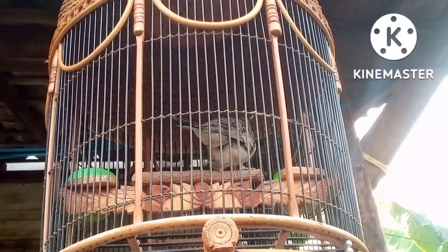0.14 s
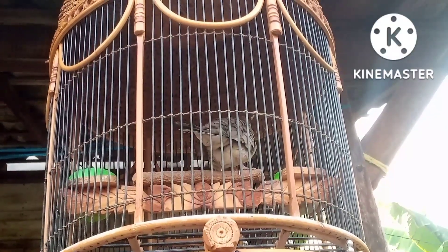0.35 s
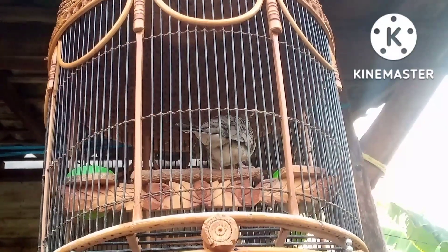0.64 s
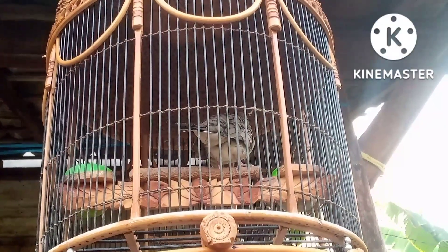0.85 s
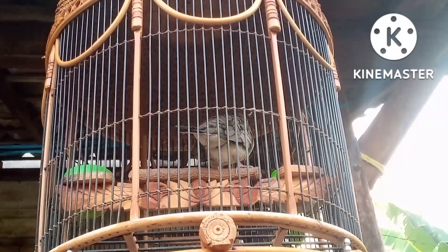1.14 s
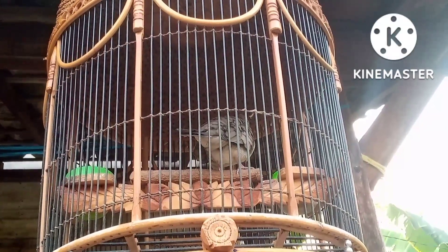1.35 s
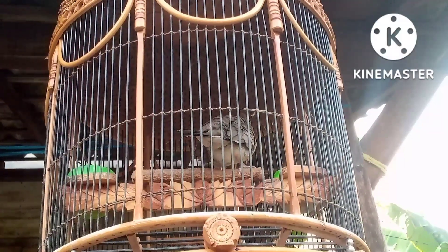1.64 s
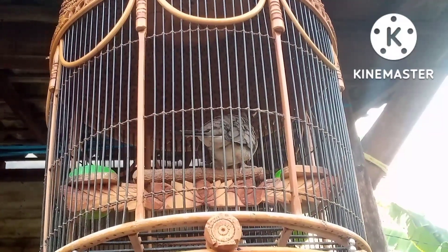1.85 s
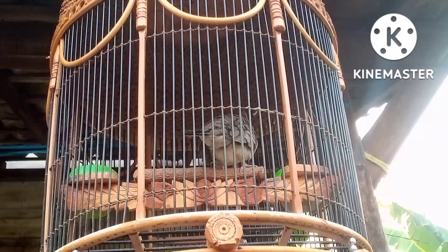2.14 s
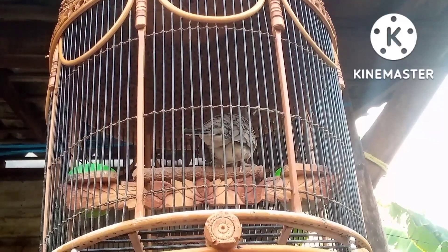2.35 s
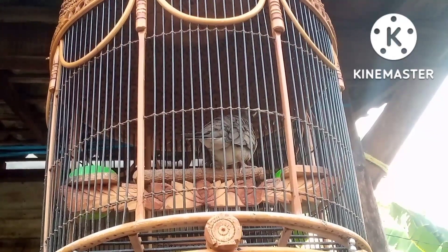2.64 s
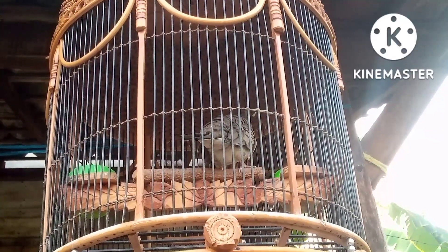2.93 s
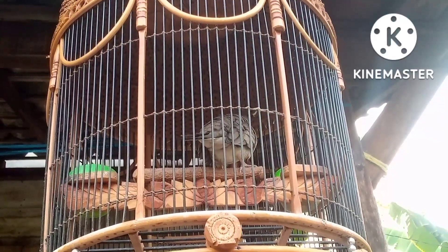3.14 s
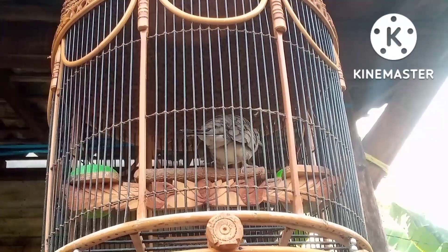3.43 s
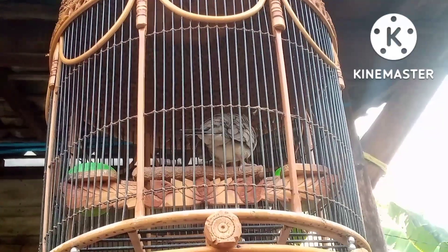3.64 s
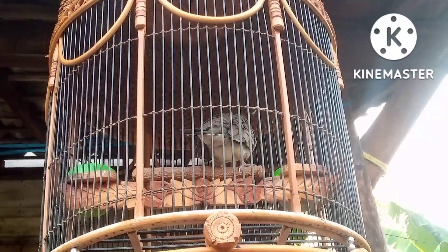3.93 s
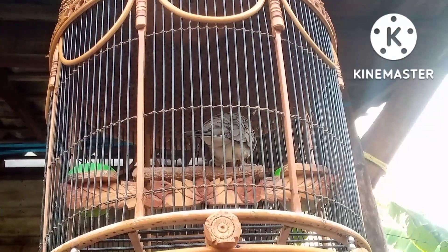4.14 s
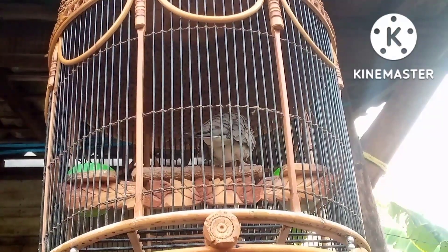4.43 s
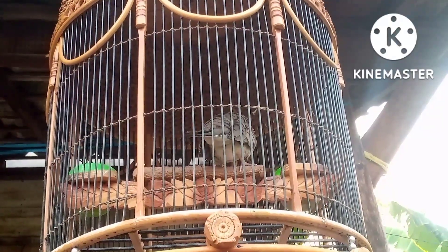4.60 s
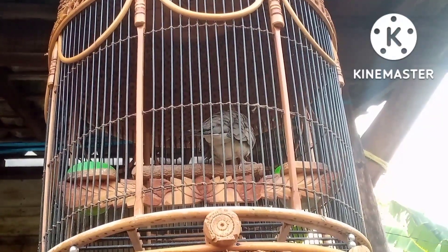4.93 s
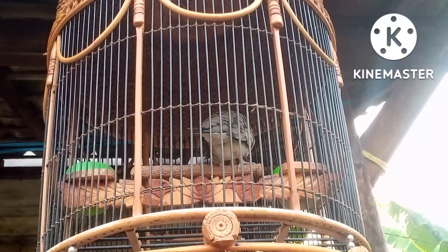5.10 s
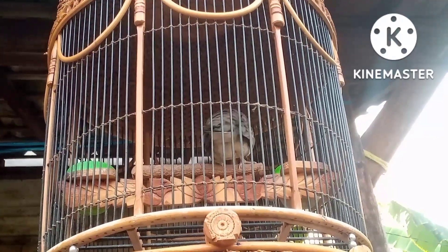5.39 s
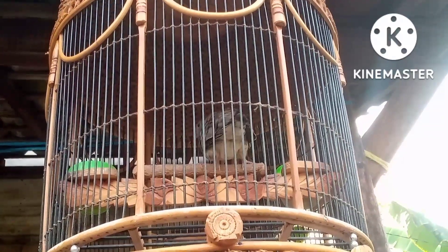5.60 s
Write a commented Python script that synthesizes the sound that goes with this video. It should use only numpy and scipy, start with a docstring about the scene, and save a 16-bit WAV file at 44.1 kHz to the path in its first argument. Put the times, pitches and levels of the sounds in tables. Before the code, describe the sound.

Under a porch roof, a distant dove coos faintly twice while a small bird whistles thinly and something ticks and swishes. A low hum swells, then a rooster close by crows loudly with cracks and a long held ending. A far rooster answers dimly, swishes return, and the caged dove gives a short throbbing coo. Low traffic rumbles throughout; mono phone pickup with short roof echoes.

```python
"""From the start a far dove coos twice, a small bird whistles high up, and something ticks and swishes.
At 2 s a low hum swells; a rooster crows close by, its voice built from partials, cracks and rasping air.
As it ends, a rooster far off answers with blurred low partials, and the whistle and swish return.
Last, a caged dove under a porch roof coos in short throbbing trills made of near sines.
Traffic noise rumbles all along; roof and yard echo, and a phone picks it all up in mono."""
import sys
import numpy as np
from scipy import signal
from scipy.fft import rfft, irfft, next_fast_len
from scipy.io import wavfile
from scipy.ndimage import uniform_filter1d

SR = 44100
rng = np.random.default_rng(int(sys.argv[2]) if len(sys.argv) > 2 else 0)


def transcribe(signal):
    """Save signal, clipped to [-1, 1], as a 16-bit WAV file at the path in sys.argv[1]."""
    frames = np.atleast_2d(signal).T
    limited = np.clip(frames, -1, 1)
    pcm = np.round(limited * 32767).astype(np.int16)
    wavfile.write(sys.argv[1], SR, pcm)


N = 254016

# All levels are relative: the functions may add to them.
# Near rooster, one list a note: (time [s], pitch [Hz], level [dB], beak resonance [Hz],
# level of the upper partials [dB])
CROW_NOTES = [
    [(2.129, 514.4, -42, 1660, -49), (2.151, 619.2, -41.5, 2400, -41), (2.187, 625.3, -30.5, 2530, -42.5),
     (2.192, 669, -31, 1380, -49)],
    [(2.198, 813.4, -34.5, 1700, -31), (2.222, 819.3, -27.5, 1620, -36.5), (2.26, 809.8, -30, 1660, -34.5),
     (2.28, 804.2, -33, 1794, -36.5), (2.322, 818, -41.5, 1700, -46.5), (2.345, 773.6, -38.5, 1660, -45)],
    [(2.432, 571, -54, 1280, -56), (2.445, 640.7, -38, 1315, -44), (2.46, 796, -25, 2003, -37),
     (2.47, 856, -36.5, 1780, -37), (2.482, 851.3, -23, 1800, -37)],
    [(2.488, 971, -28, 1926, -33.5), (2.516, 962.8, -27, 2020, -33.5), (2.566, 990.3, -36.5, 1645, -37),
     (2.59, 994, -35, 1600, -55)],
    [(2.612, 602.5, -51, 1340, -56), (2.635, 619, -46, 1260, -49.5), (2.652, 644, -41.5, 1350, -45),
     (2.662, 760.4, -23.5, 1900, -39), (2.678, 756.7, -28.5, 2250, -39.5), (2.708, 777, -26.5, 1651, -31.5)],
    [(2.716, 812, -30.5, 1480, -29), (2.732, 825, -31, 1667, -33), (2.8, 842.2, -32.5, 1680, -35),
     (2.956, 830.3, -33.5, 1690, -34), (3.044, 827.6, -32, 1713, -33.5), (3.06, 809, -30, 1596, -46)],
    [(3.066, 810, -47, 1643, -44.5), (3.102, 688, -47, 1448, -46.5), (3.124, 565, -40, 1702, -47.5),
     (3.15, 627, -44.5, 1343, -46), (3.184, 654.3, -33, 1350, -38)],
    [(3.192, 788, -30.5, 1691, -43.5), (3.238, 784, -32.5, 1634, -40.5), (3.48, 783, -33, 1692, -42.5),
     (3.55, 780.5, -33.5, 1548, -40), (3.59, 778.7, -34.5, 1570, -45.5), (3.63, 792.9, -27.5, 1826, -38.5),
     (3.674, 793.3, -29.5, 1720, -46), (3.71, 794.7, -33, 2400, -42), (3.73, 784.7, -30.5, 1760, -52),
     (3.745, 767, -30.5, 1863, -63.5), (3.775, 780, -44.5, 1820, -57)],
]
# Throat's effect on the upper partials and breath, first notes: (frequency [Hz], level [dB])
FIRST_THROAT = [(2180, -58), (3700, -57.5), (4900, -14.5), (5330, -23), (5830, -7.5), (6230, -17.5),
                (6780, 2), (7110, -14), (7690, -5), (8060, -30), (8610, -17.5), (9600, -26.5), (15500, -35)]
# The same in the long last note: (frequency [Hz], level [dB])
LAST_THROAT = [(2180, -42), (3700, -25.5), (4460, -34), (5460, -4), (5910, -8), (7870, -7), (8260, -37),
               (10200, -15.5), (10600, -57), (11500, -23), (13000, -59), (14800, -21.5), (15500, -7.5)]
# Throat's effect on the four lowest partials: (frequency [Hz], level [dB])
LOW_PARTIAL_THROAT = [(500, -24), (640, -14), (800, -10.5), (980, -10), (1250, -10.5), (1650, -12),
                      (2000, -13), (2450, -15), (2750, -29), (2950, -36.5), (3150, -27.5), (3280, -24),
                      (3380, -9.5), (4000, -32)]
# Colour of the air rasping in the throat: (frequency [Hz], level [dB per Hz])
RASP_COLOUR = [(260, -47), (450, -71), (767, 9), (1090, -25), (1370, 1), (2130, 3), (2870, -21), (3420, -5),
               (4340, -25.5), (6470, -6), (8700, -53), (15500, -56)]
# Moments when the voice cracks: (time [s], added roughness [0-1], half length [s])
VOICE_CRACKS = [(2.125, .1, .02), (2.24, .03, .08), (2.29, .22, .02), (2.445, .22, .03), (2.52, .04, .06),
                (2.57, .22, .03), (2.635, .22, .025), (2.7, .17, .013), (3.085, .46, .035),
                (3.19, .12, .015), (3.77, .12, .04)]
# One held note trembles: (start [s], end [s], rate [Hz], share of pitch [ratio], level swing [dB])
NOTE_TREMBLE = 2.756, 3.06, 35, .004, 3.5
# Caged dove: (start [s], length [s], start pitch [Hz], top pitch [Hz], end pitch [Hz], level [dB])
CAGED_COOS = [(5.198, 0.16, 876, 1200, 1082, -38.5), (5.366, 0.049, 1085, 1119, 990, -46.5),
              (5.418, 0.088, 1013, 1006, 972, -50), (5.515, 0.073, 1019, 1066, 1040, -50),
              (5.612, 0.09, 935, 1122, 1094, -41)]
# Dove farther off: (start [s], length [s], start pitch [Hz], top pitch [Hz], end pitch [Hz], level [dB])
DISTANT_COOS = [(0.022, .042, 1114, 1149, 1138, -49), (0.075, 0.043, 1122, 1112, 1124, -54.5),
                (0.148, 0.204, 1034, 1133, 1136, -51), (1.37, 0.366, 1114, 1280, 1192, -69)]
# Air around a coo: (frequency [Hz], level [dB per Hz])
COO_AIR = [(750, -14), (1050, 4), (1350, -7), (1700, -13.5), (2150, -9), (2500, -12.5), (2800, -28)]
# Far rooster: (start [s], length [s], start pitch [Hz], middle pitch [Hz], end pitch [Hz], level [dB],
# beak resonance [Hz])
FAR_NOTES = [(3.95, 0.21, 548.5, 549.5, 565, -66.5, 1100), (4.16, 0.097, 584, 606.4, 585, -64, 1200),
             (4.27, 0.3, 569.5, 552.4, 558, -64, 1080), (4.61, 0.0894, 520, 525, 523.7, -60.5, 2610),
             (4.8, 0.14, 496.5, 498, 503.3, -63, 1980), (5.03, 0.12, 529.6, 518, 523, -69, 2088),
             (5.17, .05, 632, 650, 650, -62, 1300)]
# Strength of the far rooster's partials, lowest first: (level [dB])
FAR_PARTIALS = [-7.5, -2, 4.5, -4, -20]
# Small bird: (start [s], length [s], start pitch [Hz], lowest pitch [Hz], level [dB])
BIRD_NOTES = [(0.09, 0.24, 6860, 6430, -70.5), (0.584, 0.05, 7070, 6300, -70),
              (0.728, 0.043, 7600, 7230, -71.5), (0.947, .05, 7100, 6560, -69),
              (1.236, .05, 7560, 6950, -68.5), (1.435, 0.081, 7240, 6560, -67),
              (1.575, 0.17, 6900, 6480, -67.5), (1.875, 0.17, 6780, 6450, -62.5),
              (4.387, .22, 6720, 6580, -64.5), (5.044, 0.22, 6820, 6545, -66)]
# Ticks: (time [s], peak level [dB], centre [Hz])
TICK_EVENTS = [(0.2644, -70, 6600), (0.7946, -51.5, 6100), (0.8144, -54, 5850), (1.07, -55, 6940),
               (1.2072, -58.5, 5600)]
# Swishes: (start [s], rise [s], fall [s], level [dB], level of the treble layer [dB])
SWISH_EVENTS = [(0.25, 0.036, 0.19, -75, -100), (1.65, 0.044, 0.34, -69.5, -92),
                (3.95, 0.11, 0.2, -78, -99), (4.4, 0.063, 0.13, -77.5, -98), (4.74, .13, 0.087, -73, -81.5),
                (5.1, .17, 0.14, -77, -96), (5.41, 0.2, 0.055, -68.5, -79), (5.7, .06, .02, -79, -88)]
# Colour of a swish: (frequency [Hz], level [dB per Hz])
SWISH_BODY = [(710, -29.5), (1200, -0.5), (1530, -8.5), (1870, -10), (2060, -6), (2310, -10.5), (3570, -20),
              (6650, -6), (8500, -40), (11000, -51), (18700, -120)]
# Colour of its treble layer: (frequency [Hz], level [dB per Hz])
SWISH_TREBLE = [(4710, -26), (8000, -4.5), (10600, -14), (12500, -32), (14900, -5), (15500, -0.5)]
# Low hum: (middle [s], half length [s], pitch [Hz], level [dB])
LOW_HUM = 2, 0.34, 200.5, -58.5
# Colour of the distant noise: (frequency [Hz], level [dB per Hz])
YARD_COLOUR = [(18, -35), (30, -21), (66, -2.5), (111, 0), (270, -11), (897, -29.5), (1110, -25.5),
               (1330, -28.5), (2130, -28.5), (3590, -47.5), (5890, -32.5), (6890, -37), (8280, -57),
               (13300, -59), (15500, -48)]
# Swells of a low engine note: (time [s], level [dB])
ENGINE_SWELLS = [(0.15, -57), (0.61, -58.5), (1.07, -55.5), (1.83, -57), (2.34, -69), (5.3, -82),
                 (5.76, -68)]

# hoarseness: a small constant part, more when the membrane is slack (low pitch), none extra when taut
CLEAN, TAUT_HZ, SLACK_HZ, SLACK_ROUGH = .032, 670, 560, .33
HELD_FROM_S = 3.15  # from here the throat has its last shape
BEAK_DB, FAR_BEAK_DB, BEAK_OCTAVES = 12.5, 6.5, 0.2  # lift near and far, half width
WHISTLE_FALL_S, WHISTLE_ENTRY_DB = .065, -4
WHISTLE_FADE_DB_S, WHISTLE_RECOVER_HZ_S = -40, 695  # change per second
SWISH_EDGE_DB = -10  # at both ends, under the peak
YARD_DB = -57
RUMBLE_HZ, RUMBLE_WIDTH_HZ, RUMBLE_IDLE_DB, RUMBLE_SWELL_S = 63.3, 4.3, -76, 0.13
# echoes: time for the bass to fade by 60 dB, and level of each echo path
PORCH_T60_S, PORCH_DB, YARD_T60_S, YARD_ECHO_DB = 0.42 / 1.5, -12.5, 1 / 1.5, -21
DULL_HZ = 8300 * np.sqrt(1.5)  # here echoes fade twice as fast as in the bass
SCATTER = 0.65
TOP_HZ = 15550  # top of the phone's range


def undb(db):
    """Turn decibels into an amplitude factor."""
    return 10 ** (np.asarray(db) / 20)


def unit(x):
    """Scale to an average strength (RMS) of 1."""
    return x / np.sqrt(np.mean(x ** 2))


def clock():
    """Time of every sample in seconds."""
    return np.arange(N) / SR


def turns(hz):
    """Add up a changing pitch into the angle of a sine."""
    return 2 * np.pi * np.cumsum(hz) / SR


def colour(x, points):
    """Filter by (Hz, dB) points joined on a log-frequency axis; nearly silent beyond them."""
    hz, db = np.transpose(points)
    f = np.maximum(np.arange(len(x) // 2 + 1) * SR / len(x), 1)
    gain_db = np.interp(np.log(f), np.log(hz), db, left=-90, right=-90)
    return irfft(rfft(x) * undb(gain_db), len(x))


def hiss(points):
    """Noise coloured by (Hz, dB) points, at strength 1."""
    return unit(colour(rng.standard_normal(N), points))


def walk(rate, at=slice(None)):
    """Smooth random drift of spread about 1; a higher rate drifts faster."""
    steps = uniform_filter1d(rng.standard_normal(int(4 * rate * N / SR) + 8), size=5)
    steps = unit(uniform_filter1d(steps, size=3))
    return np.interp(clock()[at], np.linspace(0, N / SR, len(steps)), steps)


def play(notes, fade_s):
    """Draw the columns of all notes over time, with a gate that opens during each note."""
    s, *columns = np.transpose(np.concatenate(notes))
    gate = 0
    for note in notes:
        start_s, end_s = note[0][0], note[-1][0]
        gate = gate + np.interp(clock(), [start_s - fade_s, start_s, end_s, end_s + fade_s], [0, 1, 1, 0])
    return np.minimum(gate, 1), [np.interp(clock(), s, c) for c in columns]


def syllables(rows, rise, hold, entry_db, sag_db):
    """Each syllable moves to its middle pitch, glides to its end pitch at full level, then changes level."""
    # rise and hold are shares of the length
    return [[(s, start_hz, db + entry_db, *rest),
             (s + rise * length, hz, db, *rest),
             (s + min(rise + hold, .97) * length, end_hz, db, *rest),
             (s + length, end_hz, db + sag_db, *rest)]
            for s, length, start_hz, hz, end_hz, db, *rest in rows]


def beak_lift(hz, beak_hz, lift_db):
    """The beak resonance lifts partials close to it, in dB."""
    return lift_db * np.exp(-(np.log2(hz / beak_hz) / BEAK_OCTAVES) ** 2)


def rooster():
    """Partials of one membrane; hoarseness shakes the cycles, adds half lines and lets air rasp through."""
    gate, columns = play(CROW_NOTES, fade_s=.003)
    on = gate > 0
    t = clock()[on]
    hz, *shape = (c[on] for c in columns)
    # muscles change the loudness no faster than this
    level_db, beak_hz, upper_db = uniform_filter1d(shape, size=500)
    rough = CLEAN + np.interp(hz, [SLACK_HZ, TAUT_HZ], [SLACK_ROUGH, 0])
    rough = rough + sum(r * np.exp(-((t - s) / half) ** 2) for s, r, half in VOICE_CRACKS)

    start_s, end_s, tremble_hz, share, tremble_db = NOTE_TREMBLE
    tremble = (t > start_s) * (t < end_s) * np.sin(2 * np.pi * tremble_hz * (t - start_s))
    pitch_shake = share * tremble + 0.002 * walk(43.6, on) + 0.299 * rough ** 2 * walk(356, on)
    phase = turns(hz * (1 + pitch_shake)) + rough * 0.81 * walk(450, on)

    held = t > HELD_FROM_S
    voice = 0
    for k in range(1, 25):
        low_db, first_db, held_db = (
            np.interp(np.log(k * hz), np.log(np.array(p)[:, 0]), np.array(p)[:, 1], right=-90)
            for p in (LOW_PARTIAL_THROAT, FIRST_THROAT, LAST_THROAT))
        # the upper partials usually flutter faster than the strong low ones
        if k < 5:
            partial_db = low_db + level_db + beak_lift(k * hz, beak_hz, BEAK_DB) + 2.56 * walk(35, on)
        else:
            flutter_db = (1.57 + 0.081 * k) * walk(60, on)
            partial_db = upper_db - 7 + np.where(held, held_db, first_db) + flutter_db
        # every second cycle is a little weaker, most plainly in the upper partials
        unevenness = np.minimum(np.where(held, .004, .002) * k * k, .4) + 0.41 * rough
        uneven = 1 + unevenness * np.sin(phase / 2 + k)
        strength = undb(partial_db + tremble_db * tremble / np.sqrt(k))
        voice = voice + strength * uneven * np.sin(k * phase + k * k)

    breath = np.where(held, hiss(LAST_THROAT)[on], hiss(FIRST_THROAT)[on])
    rasp = undb(upper_db + 14.5) * rough ** 1.1 * hiss(RASP_COLOUR)[on]
    out = np.zeros(N)
    out[on] = np.sqrt(2) * voice + rasp + undb(upper_db - 16.0) * (1 + 4 * rough) * breath
    # the throat radiates little below the voice
    return signal.sosfilt(signal.butter(6, 520, "high", fs=SR, output="sos"), gate * out)


def dove(notes, depth, wobble, octave_db, breath_db):
    """A near sine from the swollen crop, chopped by an uneven throb, with a weak octave and a little air."""
    gate, (hz, db) = play(notes, fade_s=.011)
    # squaring the sine gives two dips per turn
    throb = 1 - depth * np.sin(turns(36 * (1 + .3 * walk(18)))) ** 2
    phase = turns(hz * (1 + wobble * walk(78.6)))
    octave = undb(octave_db + 4 * walk(30)) * np.sin(2 * phase + 2.5 * walk(150))
    air = undb(breath_db) * hiss(COO_AIR)
    return gate * undb(db + 1.5 + 2.1 * walk(48)) * throb * (np.sin(phase) + air + octave)


def far_rooster():
    """Only the low partials carry this far, blurred by the air."""
    notes = syllables(FAR_NOTES, rise=0.193, hold=0.28, entry_db=-0.5, sag_db=-13)
    gate, (hz, db, beak_hz) = play(notes, fade_s=.012)
    phase = turns(hz * (1 + 0.0202 * walk(120)))
    voice = 0
    for k, partial_db in enumerate(FAR_PARTIALS, start=1):
        lift_db = beak_lift(k * hz, beak_hz, FAR_BEAK_DB)
        voice = voice + undb(db + partial_db + lift_db - 7.5 + 5.5 * walk(35)) * np.sin(k * phase)
    return gate * voice


def small_bird():
    """Thin sine whistles that fall to their lowest pitch, then creep up again while they fade."""
    notes = []
    for s, length, hz, low_hz, db in BIRD_NOTES:
        end_hz = low_hz + WHISTLE_RECOVER_HZ_S * max(length - WHISTLE_FALL_S, 0)
        notes.append([(s, hz, db + WHISTLE_ENTRY_DB),
                      (s + min(WHISTLE_FALL_S, .9 * length), low_hz, db),
                      (s + length, end_hz, db + WHISTLE_FADE_DB_S * length)])
    gate, (hz, db) = play(notes, fade_s=0.0051)
    flutter_db = 2.8 * walk(50)
    return gate * undb(db + flutter_db) * np.sin(turns(hz * (1 + 0.0032 * walk(97))))


def ticks(events, t60_s, width, top_db):
    """Short bursts of noise that die away quickly, each around its own centre."""
    out, t = np.zeros(N), np.arange(4096) / SR
    for s, db, hz in events:
        points = [(hz / (1 + 4 * width), -20), (hz / (1 + width), -3), (hz, 0),
                  (hz * (1 + width), -5), (TOP_HZ, top_db)]
        burst = colour(rng.standard_normal(len(t)), points)
        burst = burst * np.exp(-np.log(1000) * t / t60_s)  # down 60 dB after t60_s
        start = int(s * SR)
        out[start:start + len(t)] += undb(db) * burst / np.abs(burst).max()
    return out


def swish():
    """A soft grainy brushing: two layers of noise that come and go."""
    notes = [[(s, db + SWISH_EDGE_DB, top_db + SWISH_EDGE_DB),
              (s + rise, db, top_db),
              (s + rise + fall, db + SWISH_EDGE_DB, top_db + SWISH_EDGE_DB)]
             for s, rise, fall, db, top_db in SWISH_EVENTS]
    gate, (db, top_db) = play(notes, fade_s=0.021)
    grain = undb(6.5 + 1.65 * walk(110))
    return gate * grain * (undb(db) * hiss(SWISH_BODY) + undb(top_db) * hiss(SWISH_TREBLE))


def hum():
    """A low, slightly wavering sine that swells and fades once."""
    s, half_s, hz, db = LOW_HUM
    swell = np.exp(-((clock() - s) / half_s) ** 4)
    return undb(db + 2.5 * walk(14)) * swell * np.sin(turns(hz * (1 + 0.0109 * walk(10))))


def yard():
    """Distant bass-heavy traffic noise, each band drifting on its own, and an engine note that swells."""
    wash = rfft(hiss(YARD_COLOUR))
    edges = 20 * 2 ** np.arange(0, 10, 2 / 3)  # bands two thirds of an octave wide
    band = np.searchsorted(edges, np.arange(N // 2 + 1) * SR / N)
    patchy = 0
    for b in range(len(edges) + 1):
        drift_db = 3.02 * walk(5.1) + 1.7 * walk(18)
        patchy = patchy + undb(drift_db) * irfft(wash * (band == b), N)
    engine = hiss([(RUMBLE_HZ - RUMBLE_WIDTH_HZ, -12), (RUMBLE_HZ, 0), (RUMBLE_HZ + RUMBLE_WIDTH_HZ, -12)])
    swells = sum(undb(db) * np.exp(-((clock() - s) / RUMBLE_SWELL_S) ** 2) for s, db in ENGINE_SWELLS)
    return undb(YARD_DB) * unit(patchy) + (undb(RUMBLE_IDLE_DB) + swells) * engine


def echoes(x):
    """Sound goes to and fro under the roof, and more slowly between the yard walls; treble dies first."""
    size = next_fast_len(N + 2 * SR)
    f = np.arange(size // 2 + 1) * SR / size
    tails = 0
    for first_s, t60_s, db in ((.0083, PORCH_T60_S, PORCH_DB), (.037, YARD_T60_S, YARD_ECHO_DB)):
        for k, lag_s in enumerate(first_s * 1.187 ** np.arange(8)):
            loss_db = -60 * lag_s / t60_s * (1 + (f / DULL_HZ) ** 2)
            loop = undb(loss_db) * np.exp(-2j * np.pi * f * lag_s)  # one trip: weaker and later
            tails = tails + (-1) ** k * undb(db) * loop / (1 - loop)  # all trips added up
    # rough surfaces scatter each return
    for lag_s in (.0013, .0037, .0059):
        turn = np.exp(-2j * np.pi * f * lag_s)
        tails = tails * (turn - SCATTER) / (1 - SCATTER * turn)
    return irfft(rfft(x, size) * tails, size)[:N]


def scene():
    """Mix the animals, the ticks and their echoes with the swish, the yard noise and the hum."""
    caged_notes = syllables(CAGED_COOS, rise=.33, hold=.45, entry_db=-11.5, sag_db=-5)
    distant_notes = syllables(DISTANT_COOS, rise=0.1395, hold=0.34, entry_db=3.5, sag_db=-12.5)
    doves = dove(caged_notes, depth=0.64, wobble=0.04, octave_db=-29, breath_db=-20.5)
    doves = doves + dove(distant_notes, depth=0.63, wobble=0.0116, octave_db=-38, breath_db=-19)
    far = far_rooster()
    voices = rooster() + doves + 0.9 * far + small_bird()
    taps = ticks(TICK_EVENTS, t60_s=0.047, width=0.099, top_db=-42)
    # the far rooster gets extra echo, the ticks get half
    reflected = echoes(voices + 0.82 * far + taps / 2)
    mix = voices + reflected + taps + swish() + yard() + hum()
    return mix[None]


def record(dry):
    """The phone cuts the top with a steep low-pass filter."""
    return signal.sosfilt(signal.ellip(10, .2, 80, TOP_HZ, fs=SR, output="sos"), dry)


dry = scene()
out = record(dry)
transcribe(out)
```